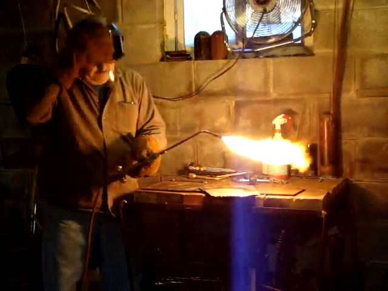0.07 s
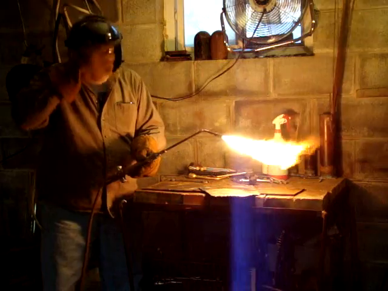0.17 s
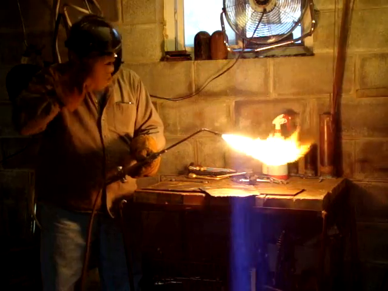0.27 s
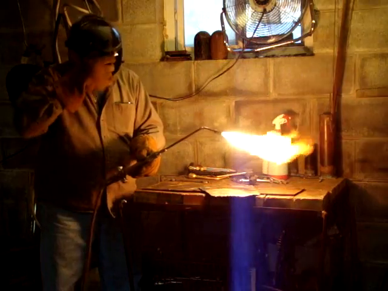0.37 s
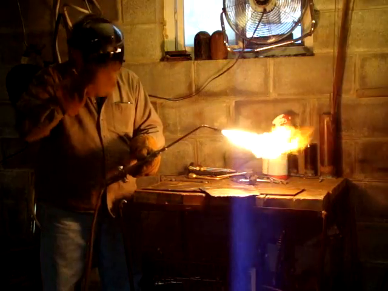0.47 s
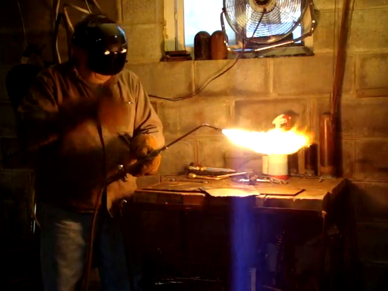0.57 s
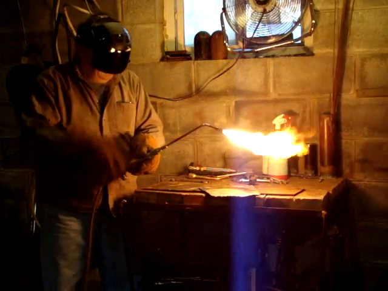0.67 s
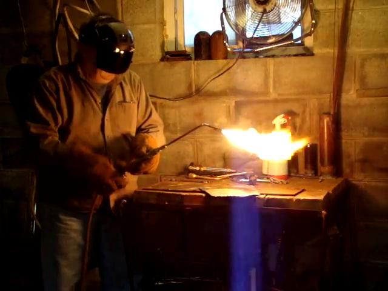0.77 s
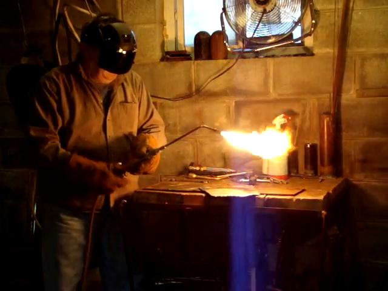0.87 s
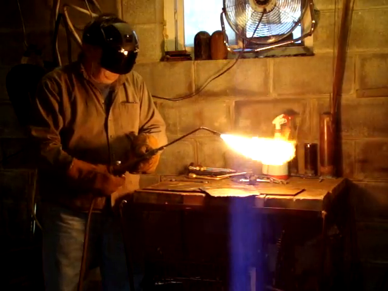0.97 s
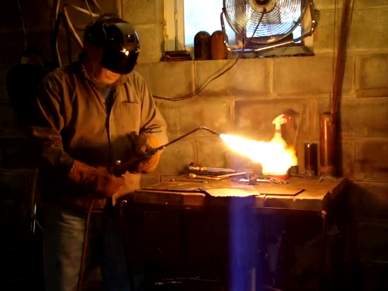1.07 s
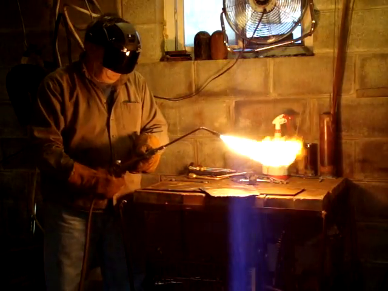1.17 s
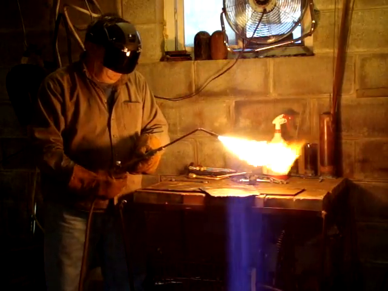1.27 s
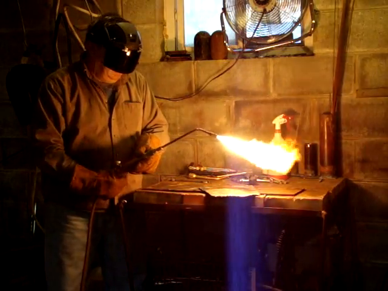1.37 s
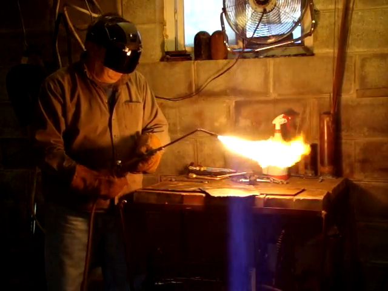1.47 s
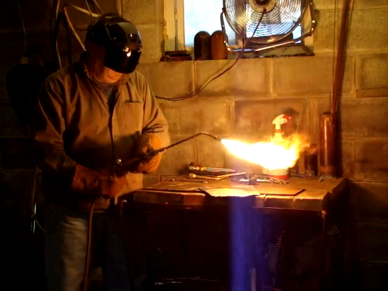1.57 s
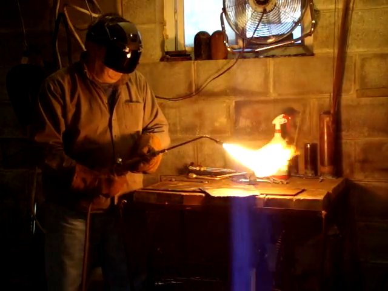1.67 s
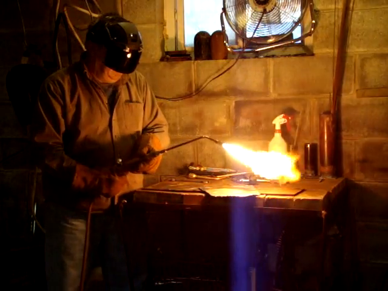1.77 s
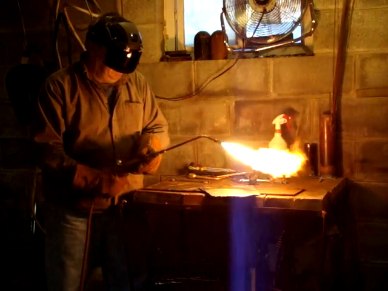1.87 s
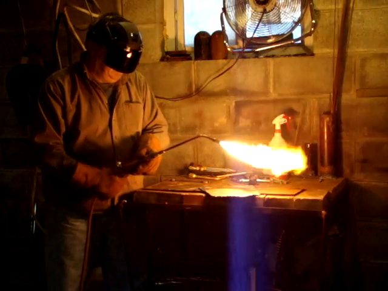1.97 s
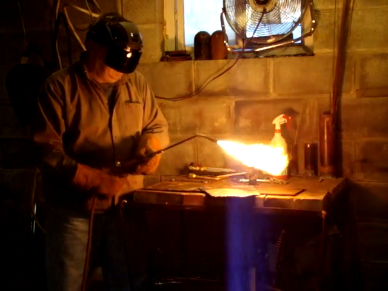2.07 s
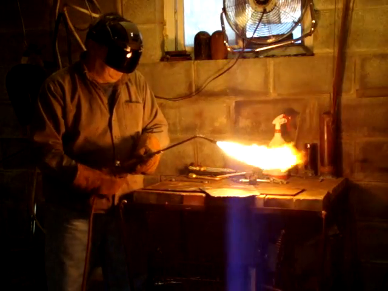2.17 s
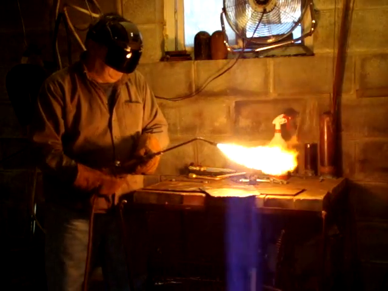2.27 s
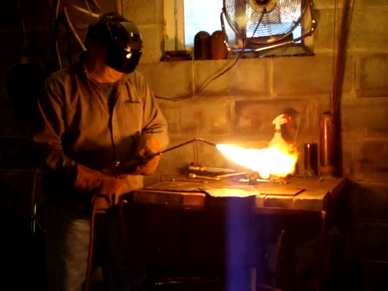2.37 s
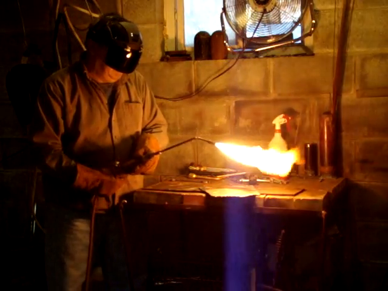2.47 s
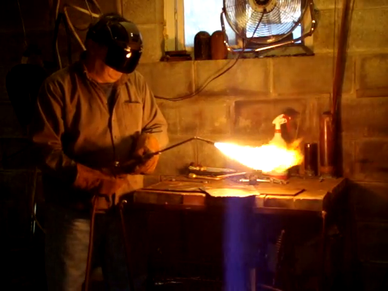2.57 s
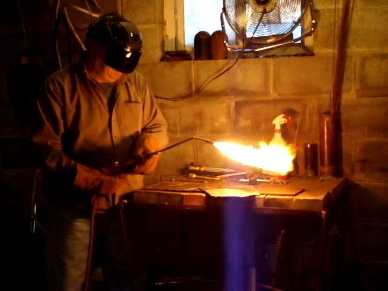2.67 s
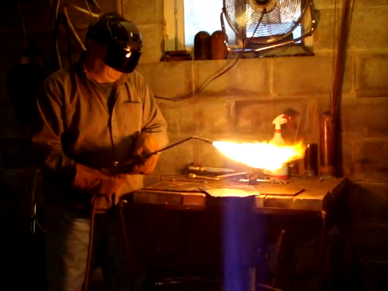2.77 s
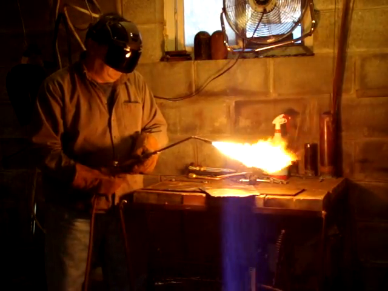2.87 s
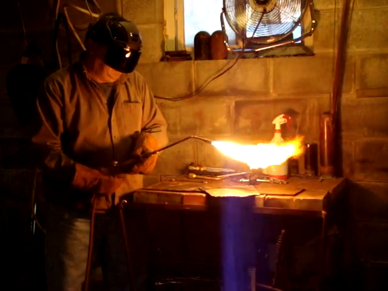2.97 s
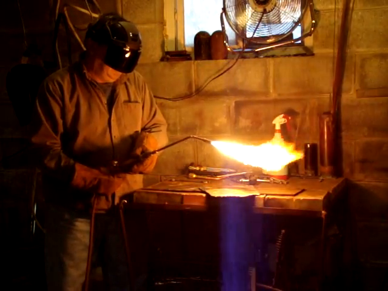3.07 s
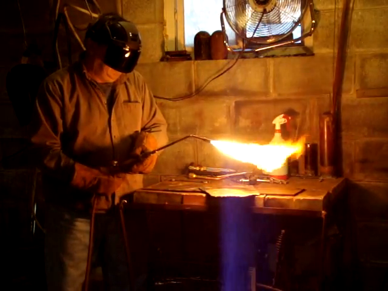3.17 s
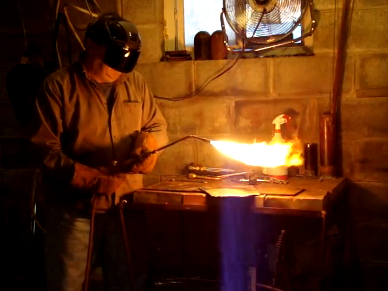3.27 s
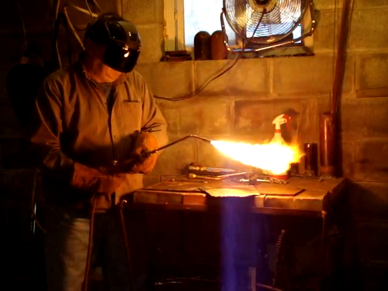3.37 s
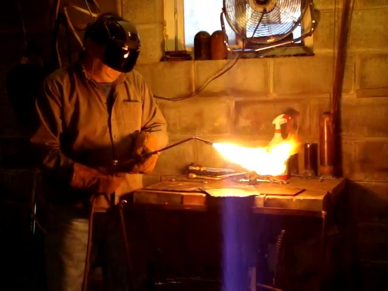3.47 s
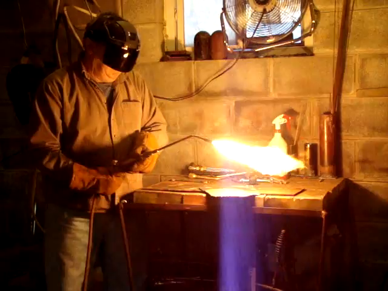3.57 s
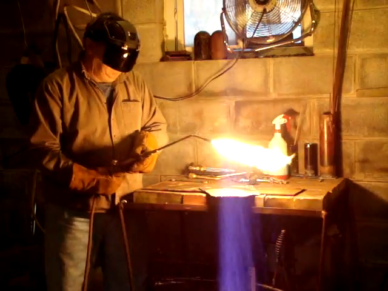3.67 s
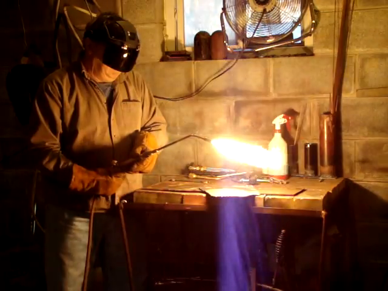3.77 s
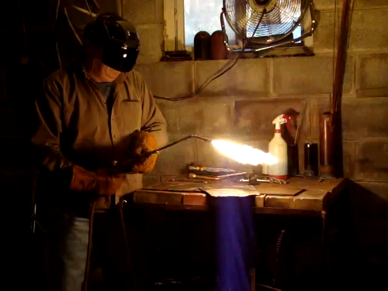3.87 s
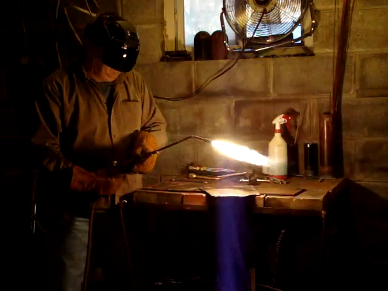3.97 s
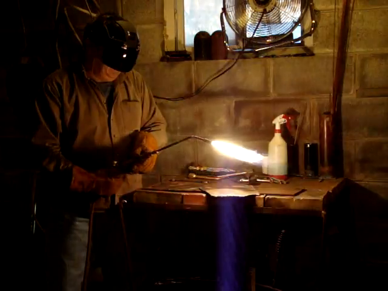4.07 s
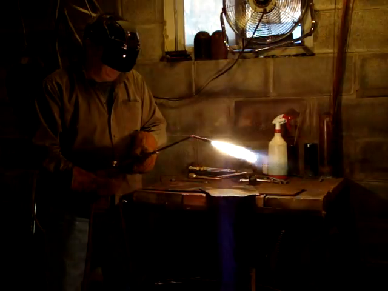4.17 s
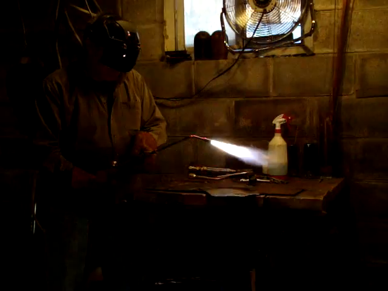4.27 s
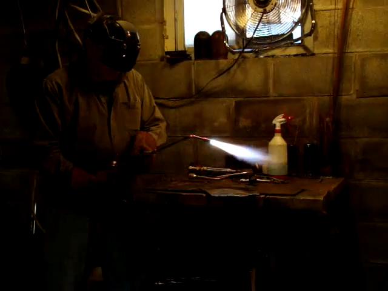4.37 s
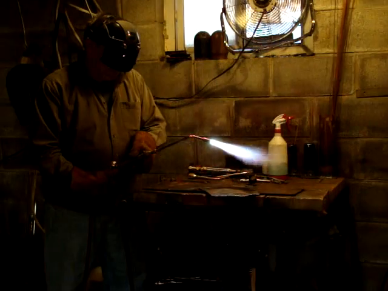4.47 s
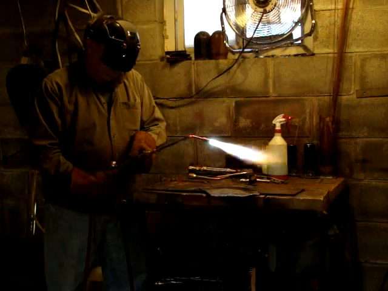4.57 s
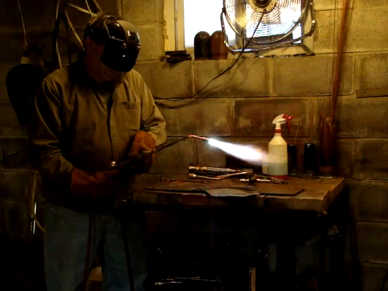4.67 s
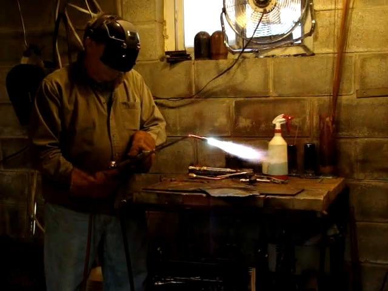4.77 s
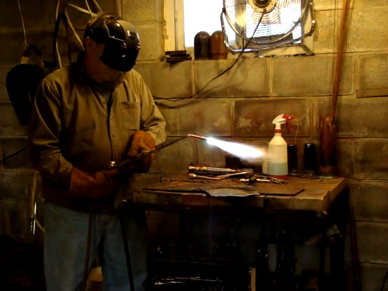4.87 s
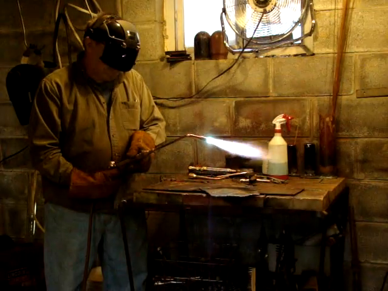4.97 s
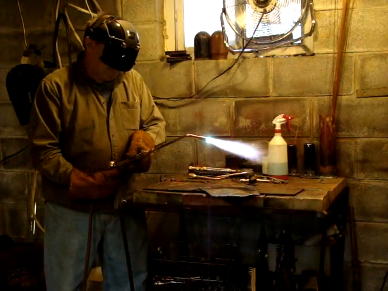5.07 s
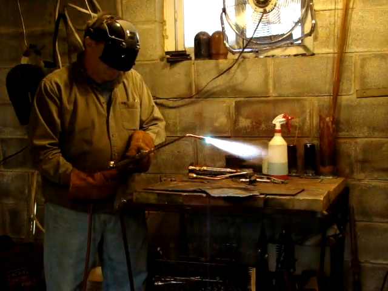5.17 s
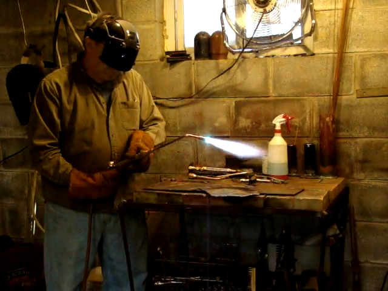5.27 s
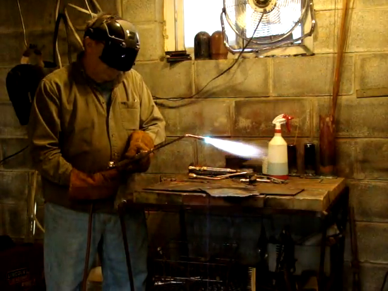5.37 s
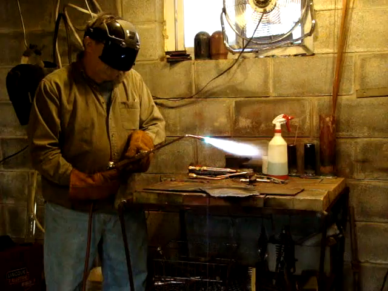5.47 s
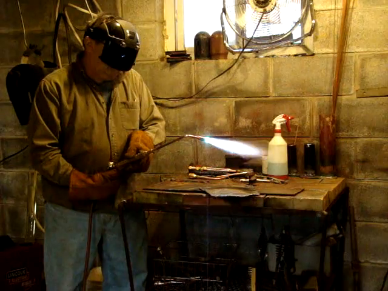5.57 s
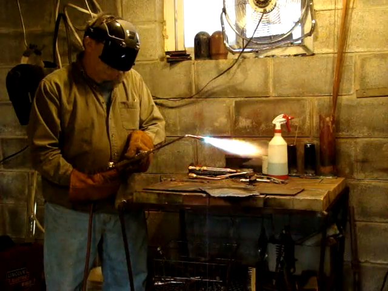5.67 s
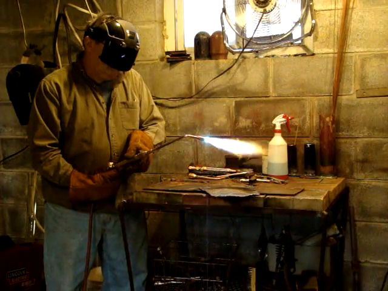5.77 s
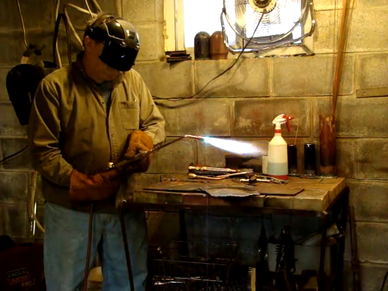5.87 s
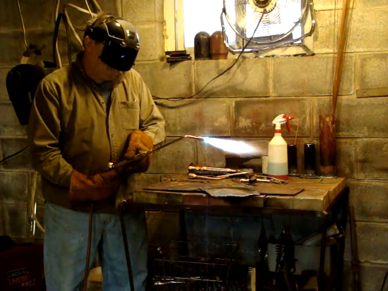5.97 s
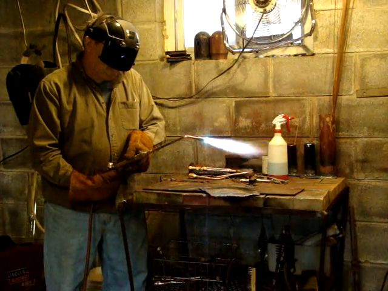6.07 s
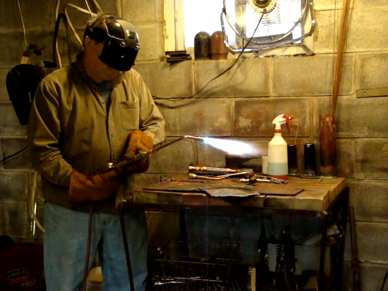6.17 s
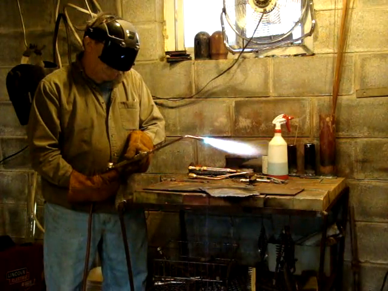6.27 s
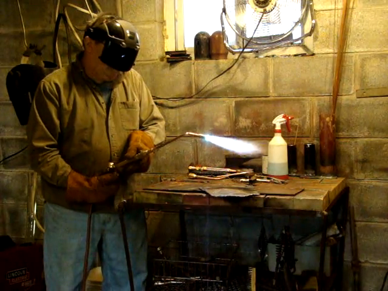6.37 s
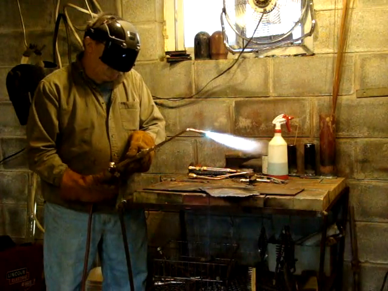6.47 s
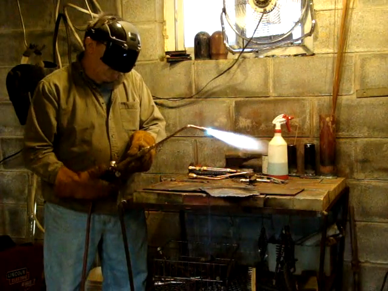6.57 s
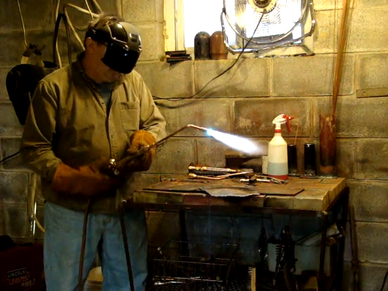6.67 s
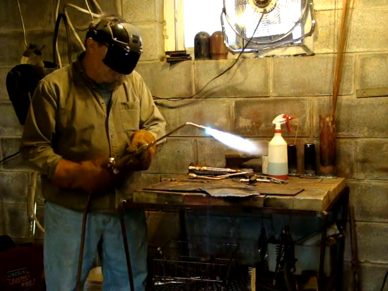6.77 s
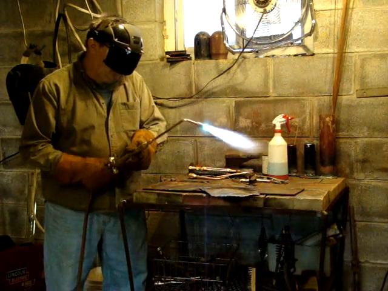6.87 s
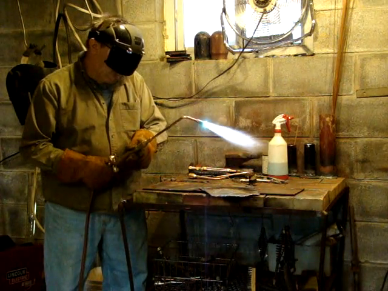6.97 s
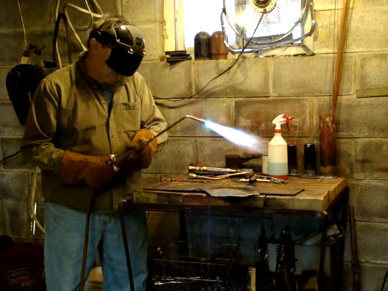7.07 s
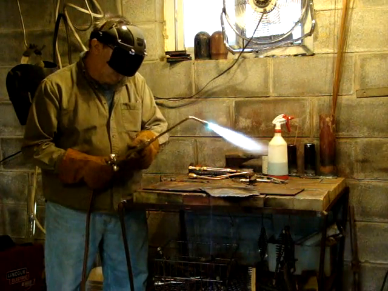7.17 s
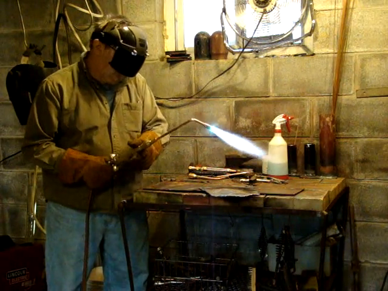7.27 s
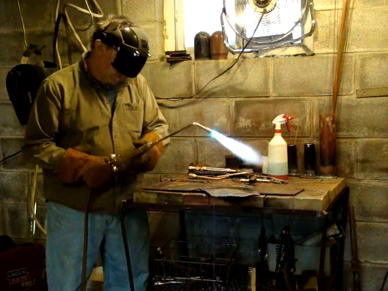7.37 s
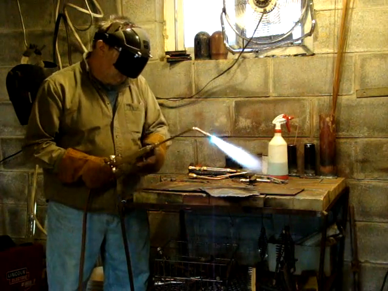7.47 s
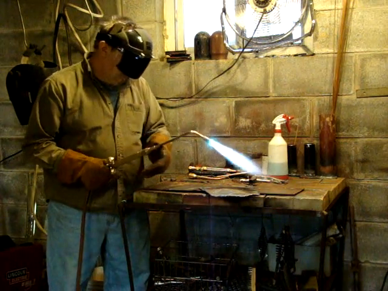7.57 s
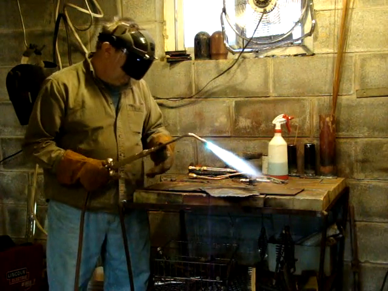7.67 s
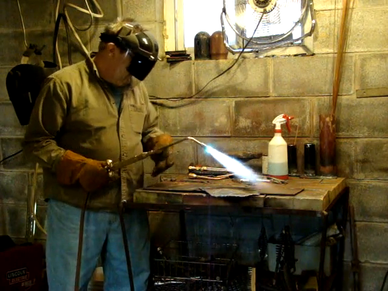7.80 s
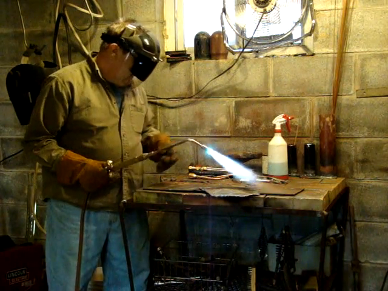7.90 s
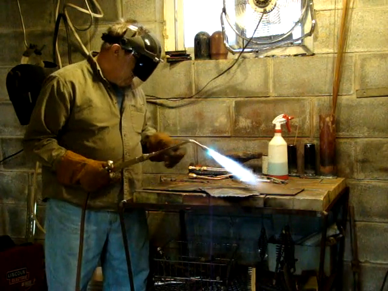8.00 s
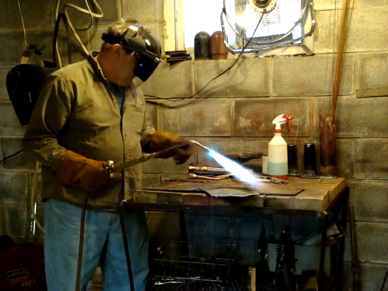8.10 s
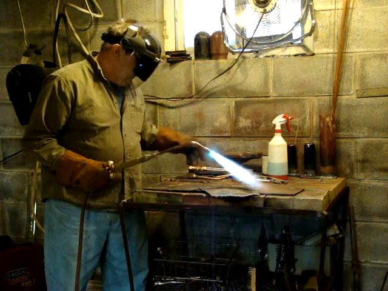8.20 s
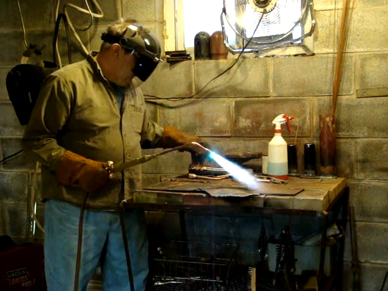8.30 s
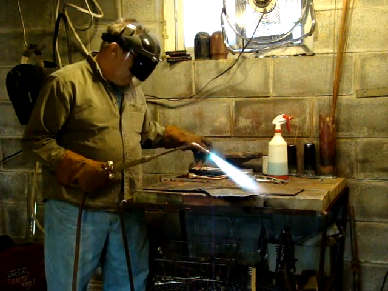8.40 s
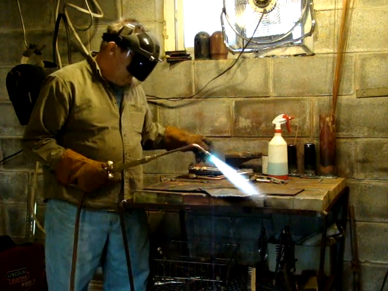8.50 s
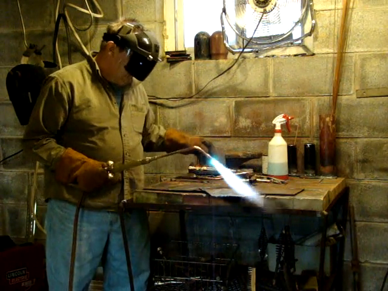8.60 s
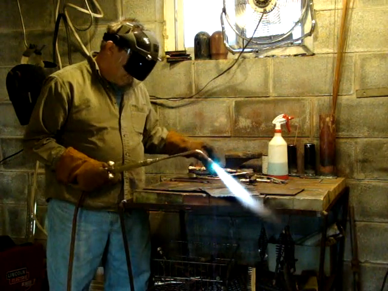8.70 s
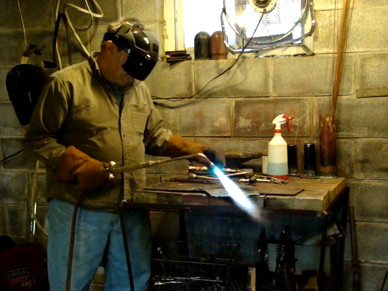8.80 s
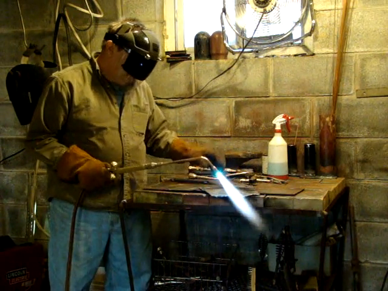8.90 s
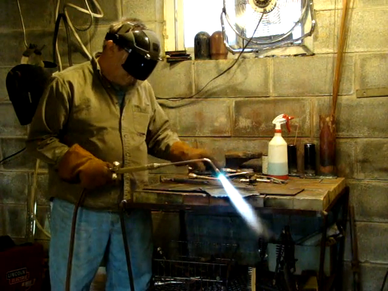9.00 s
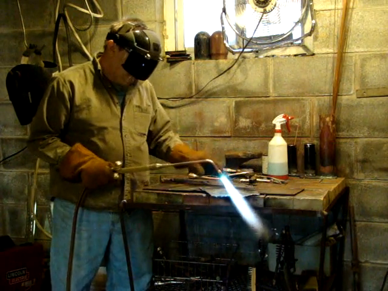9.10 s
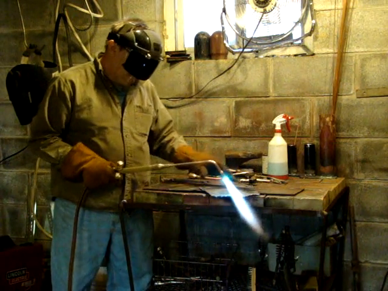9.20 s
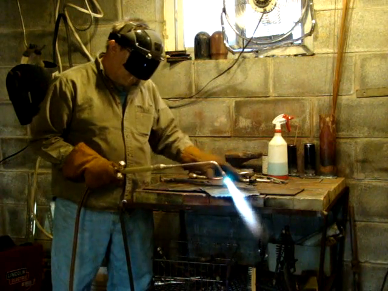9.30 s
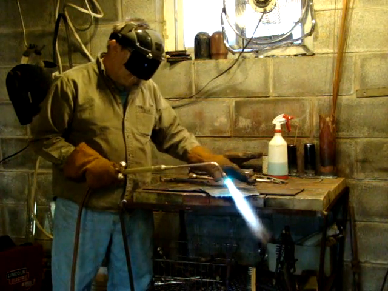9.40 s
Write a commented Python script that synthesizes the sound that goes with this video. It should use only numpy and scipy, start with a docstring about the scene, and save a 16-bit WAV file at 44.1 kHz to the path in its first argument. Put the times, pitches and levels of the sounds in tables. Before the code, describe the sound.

A torch flame roars steadily in a small workshop, flares into a loud gas rush that sweeps upward, then settles to a sharp hiss.

```python
"""An oxy-acetylene cutting torch burns over a steel bench in a small block-walled workshop.
First the long yellow acetylene flame roars. Oxygen is opened: the roar flares, and the rush of gas swells,
sinks in pitch, then sweeps upward as the flame shrinks. A short blue flame is left hissing, its cone rustling
lower down. The torch is then lowered toward the bench, and at last its tip turns away.
Each source is noise shaped by a spectrum that changes in time; the room adds peaks, nulls and echoes."""
import sys
import numpy as np
from scipy import signal
from scipy.io import wavfile
from scipy.ndimage import uniform_filter1d

SR = 44100
rng = np.random.default_rng(int(sys.argv[2]) if len(sys.argv) > 2 else 0)


def unload_audio(sound):
    """Save the sound as a 16-bit wav file, at the path given as the first command line argument."""
    columns = np.transpose(np.atleast_2d(sound))
    # keep every value between -1 and 1, then stretch to whole-number steps
    steps = np.round(np.clip(columns, -1, 1) * 32767)
    wavfile.write(sys.argv[1], SR, steps.astype(np.int16))


N = 416304  # length in samples

# the sound is shaped in short overlapping frames (samples); the microphone hears up to EDGE_HZ
FRAME, HOP = 4096, 512
EDGE_HZ = 10080
HZ = np.fft.rfftfreq(FRAME, 1 / SR)
TIMES = np.arange(N // HOP + 3) * HOP / SR  # start of each step in seconds

# shape of the big flame's noise, also used for the low part of the rush: pitch_hz [Hz],
# level_db [dB per Hz, only relative: each source sets its own loudness]
ROAR_SPECTRUM = [(20, -36), (70.0, -19.5), (125.0, -29), (165.0, -16), (210.0, -3), (270.0, -0.35),
                 (600.0, 0.5), (1100.0, -2), (2000.0, -3), (3500.0, -2), (5500.0, -6), (7500.0, -10),
                 (10000.0, -11)]

# the oxygen valve cracks open and the plume flares, then the yellow flame collapses
OPEN_S, COLLAPSE_S = 3.534, 3.995
FLARE_S = .28  # the flare and the first rustle of the cone both take this long to come in
# moves of the torch (start_s, length_s): the flame draws back from a spread plume to the tip,
# the torch is lowered toward the bench, and its tip turns away
SHORTENING = (2.67, 2.4)
LOWERING, TURNING = (6.1, 1.3), (8.95, .3)


def roar(flicker_db=.5):
    """Large eddies of the burning plume: a broad, flickering roar that flares and collapses."""
    steady_db, flare_db = -21.5, 4.5
    drop_db, drop_s, dying_db_per_s = 14.5, 0.12, 15.5  # a quick drop and a slow dying away
    flare = flare_db * ramp(OPEN_S, FLARE_S)
    quick_drop = drop_db * settle(COLLAPSE_S, drop_s)
    dying_away = dying_db_per_s * since(COLLAPSE_S)
    flicker = flicker_db * eddies(size=(4, 180))
    level_db = steady_db + flare - quick_drop - dying_away + flicker
    return unit_band(spectrum(ROAR_SPECTRUM)) * from_db(level_db)


def rush(rise=5.85, fall=2.4, skirt_db=-24):
    """A broad hump, steep on its low side, that climbs as the gas runs faster and its eddies shrink."""
    # loudness and centre with fuel alone, in the surge, and with the blue flame
    fuel_db, surge_db, blue_db = -35, -14, -28.5
    fuel_hz, surge_hz, blue_hz = 2600, 1450, 5640
    surge_s, attack_s, hold_s, release_s = 3.678, 0.29, 0.12, 0.52
    climb_s, climb_time_s = 3.92, 0.31

    attack = ramp(surge_s, attack_s)
    release = settle(surge_s + attack_s + hold_s, release_s)
    level_db = fuel_db + (surge_db - fuel_db) * attack + (blue_db - surge_db) * release

    # the centre sinks as the plume swells, then climbs as the flame shrinks
    sink_hz = (surge_hz - fuel_hz) * ramp(OPEN_S, climb_s - OPEN_S)
    climb_hz = (blue_hz - surge_hz) * settle(climb_s, climb_time_s)
    centre_hz = fuel_hz + sink_hz + climb_hz
    ratio = (HZ + 1) / centre_hz
    hump = 1 / np.sqrt(ratio ** -rise + ratio ** fall)
    skirt = from_db(skirt_db) * spectrum(ROAR_SPECTRUM)  # a few large eddies remain below the hump
    return unit_band(np.hypot(hump, skirt)) * from_db(level_db)


def jet(flicker_db=1.0):
    """Gas leaving the fine holes of the tip: a hiss that is strongest toward the top."""
    # shape of the hiss: pitch_hz [Hz], level_db [dB per Hz, only relative]
    jet_points = [(100, -68), (1500.0, -43), (3000.0, -25), (4500.0, -14.5), (6000.0, -11.5), (7500.0, 1.4),
                  (8800.0, 7.5), (10000.0, 6.5)]
    full_db, valve_turn_s = -24, 0.91
    sag_db, sag_time_s, turned_db = 3, 0.99, -1.1
    growth = ramp(OPEN_S, valve_turn_s)  # it grows while the valve turns
    sag = sag_db * settle(OPEN_S + valve_turn_s, sag_time_s)  # then the pressure sags a little
    turned = turned_db * ramp(*TURNING)
    level_db = full_db - sag + turned + flicker_db * eddies(size=(4, 140))
    return unit_band(spectrum(jet_points)) * growth * from_db(level_db)


def cone(flicker_db=0.8):
    """The blue inner cone rustles once the oxygen flows: faint at first, it builds after the collapse."""
    # shape of the rustle: pitch_hz [Hz], level_db [dB per Hz, only relative]
    cone_points = [(20, -34), (70.0, -27.5), (125.0, -35.5), (165.0, -17.5), (210.0, -15), (270.0, -3.5),
                   (700.0, 2.3), (1200.0, -1), (2000.0, -1), (3000.0, -3), (5000.0, -3.5), (10000.0, -19.5)]
    steady_db, growth_db, growth_time_s, turned_db = -30, 15, 1.24, -1.1
    still_missing = growth_db * (1 - settle(COLLAPSE_S, growth_time_s))
    turned = turned_db * ramp(*TURNING)
    level_db = steady_db - still_missing + turned + flicker_db * eddies(size=(6, 60))
    return unit_band(spectrum(cone_points)) * ramp(OPEN_S, FLARE_S) * from_db(level_db)


def flickering(x, above_hz=7000, depth_db=1.0):
    """The treble flickers quickly: a smoothed random gain is laid on it alone."""
    high_pass = signal.butter(6, above_hz, "high", fs=SR, output="sos")
    treble = signal.sosfiltfilt(high_pass, x)
    wobble = evened(uniform_filter1d(rng.standard_normal(N), size=280))
    return x + treble * (from_db(depth_db * wobble) - 1)


def workshop(ripple_db=3.0, first_s=.002, spread_s=.018, count=90):
    """Standing waves, plus a fine comb of echoes whose paths change as the flame moves."""
    sound_speed = 343  # m/s
    step = 8  # echoes are worked out at every eighth frame, then smoothed
    # how fast the flame wanders in a steady hand, and the speed added once lowering starts
    held_m_per_s, added_m_per_s = 0.02794, 0.0705
    moved_m = held_m_per_s * since(0) + added_m_per_s * since(LOWERING[0])
    moved_s = moved_m[::step] / sound_speed
    comb = 0
    for lateness, direction, turn in rng.random((count, 3)):
        delay_s = first_s + spread_s * lateness + np.cos(np.pi * direction) * moved_s
        comb = comb + np.cos(2 * np.pi * (HZ * delay_s + turn))
    comb = np.repeat(comb, step, axis=0)
    comb = uniform_filter1d(comb, step, axis=0)[:len(TIMES)]
    treble_share = HZ / np.hypot(HZ, 1800)  # in the bass the standing waves rule alone
    ripple = ripple_db * evened(comb) * treble_share
    return from_db(standing_waves() + ripple)


def standing_waves(walls=1.1, walls_lowered=0.6, plume=0.98, tip=0.89, bench=1.03):
    """The room's colour in dB: from plume to tip as the flame shortens, then to the bench as it is lowered."""
    # peaks and nulls between the walls, with the flame spread out, with the short flame held level,
    # and close over the bench: pitch_hz [Hz], width_hz [Hz],
    # level_db [dB, before the strengths given as arguments; negative for a null]
    wall_waves = [(214, 34, -8.4), (319, 79, 5.6), (346, 108, -3.1), (403, 75, -1.5), (488, 92, -4.4),
                  (565, 49, 1.7), (731, 22, -4.0), (797, 35, -3.6), (909, 38, 4.6), (936, 27, -6.3),
                  (986, 28, 4.6), (1023, 48, -4.3), (1187, 30, 3.3), (1252, 64, -3.7), (1383, 36, -5.4),
                  (1417, 36, 1.8), (1459, 173, 5.4), (1595, 106, -4.4), (1699, 43, 5.9), (1791, 58, 5.8),
                  (1980, 64, 6.3), (2164, 150, -2.5), (2422, 65, -4.3), (2447, 66, 5.6), (2604, 44, 3.7),
                  (2656, 35, -4.4), (2772, 91, 3.2), (3021, 122, -3.1), (3501, 30, 4.0), (4590, 115, -2.5)]
    plume_waves = [(257, 22, -2.6), (382, 56, 2.2), (602, 49, 4.3), (1137, 42, -1.9), (1309, 23, 2.1),
                   (1659, 22, -2.5), (1892, 22, -2.6), (2248, 22, -3.7), (2327, 51, 2.7), (2944, 29, 3.2),
                   (3116, 35, 3.5), (3163, 139, -2.2), (3582, 53, -3.3), (3735, 68, 3.5), (3820, 394, -1.2),
                   (4470, 90, 1.9), (4888, 31, -3.5), (5010, 244, 1.8), (5600, 51, 2.6), (6461, 188, 1.8)]
    tip_waves = [(377, 48, -2.5), (494, 22, 3.2), (616, 66, -3.6), (761, 31, 3.2), (848, 24, 3.6),
                 (1138, 35, -2.8), (1541, 34, 3.7), (1580, 43, -2.9), (2448, 70, 3.2), (2897, 47, -3.0),
                 (3128, 40, 5.3), (3206, 64, -3.2), (3241, 26, 5.8), (3453, 161, 1.9), (3797, 37, -5.7),
                 (3843, 54, 3.6), (3894, 42, -3.6), (4330, 123, -4.7), (5322, 53, -4.0), (5429, 105, -3.8),
                 (5547, 37, 4.6), (5747, 141, -2.4), (6069, 210, 3.0), (6359, 90, 4.0), (7227, 104, -4.0),
                 (7354, 77, 3.9), (8200, 241, -3.2), (9508, 88, -3.4)]
    bench_waves = [(243, 22, 3.0), (363, 65, -4.3), (402, 40, -4.3), (452, 22, 3.6), (552, 36, 3.3),
                   (595, 61, -5.6), (812, 22, 4.2), (844, 43, 5.6), (903, 30, -2.0), (1048, 42, 4.1),
                   (1146, 35, 3.6), (1685, 31, -3.6), (1814, 87, -3.8), (1978, 34, -3.2), (2461, 35, -3.3),
                   (2532, 52, 2.4), (2733, 38, -3.6), (2920, 57, -4.2), (3072, 131, 1.9), (3243, 49, -4.0),
                   (3470, 123, -2.4), (4256, 395, -1.7)]
    short, low = ramp(*SHORTENING), ramp(*LOWERING)
    spread_out = plume * (1 - short) * bumps(plume_waves)
    drawn_back = tip * short * bumps(tip_waves)
    held = walls * bumps(wall_waves) + spread_out + drawn_back
    lowered = walls_lowered * bumps(wall_waves) + bench * bumps(bench_waves)
    return (1 - low) * held + low * lowered


def eddies(size):
    """Smooth random patches of unit rms, size = (frames, bins)."""
    field = rng.standard_normal((len(TIMES), len(HZ)))
    smooth_in_time = uniform_filter1d(field, size[0], axis=0)
    return evened(uniform_filter1d(smooth_in_time, size[1], axis=1))


def spectrum(points):
    """Gain of every bin, from points joined on a log-frequency axis."""
    hz, db = np.transpose(points)
    return from_db(np.interp(np.log(HZ + 1), np.log(hz), db))


def unit_band(gain):
    """Scales a spectrum so that noise shaped by it has unit rms in the microphone's band."""
    heard_power = gain ** 2 * (HZ < EDGE_HZ)
    return gain / np.sqrt(np.mean(heard_power, axis=-1, keepdims=True))


def bumps(rows):
    """Peaks and nulls as one dB curve over frequency."""
    return sum(db * np.exp(-(2 * (HZ - hz) / width) ** 2) for hz, width, db in rows)


def since(start_s):
    """Seconds gone by since a moment, at every frame; zero before it."""
    return np.maximum(TIMES - start_s, 0)[:, None]


def ramp(start_s, length_s):
    """A steady move from 0 to 1."""
    return np.minimum(since(start_s) / length_s, 1)


def settle(start_s, time_s):
    """A move from 0 toward 1 that starts fast and eases off."""
    return 1 - np.exp(-since(start_s) / time_s)


def from_db(db):
    """Decibels to gain."""
    return 10 ** (np.asarray(db) / 20)


def evened(x):
    """Scales to an rms of one."""
    return x / np.sqrt(np.mean(x ** 2) + 1e-20)


def scene():
    """Roar, rush, jet and cone add in power and reach the microphone through the room."""
    sources = np.sqrt(roar() ** 2 + rush() ** 2 + jet() ** 2 + cone() ** 2)
    gain = sources * workshop()
    noise = rng.standard_normal((len(TIMES) - 1) * HOP)
    turbulence = signal.stft(noise, nperseg=FRAME, noverlap=FRAME - HOP)[2]
    flame = signal.istft(turbulence * gain.T, nperseg=FRAME, noverlap=FRAME - HOP)[1][:N]
    torch = flickering(flame)
    return np.array([torch, torch])  # the same sound on both sides


def record(dry):
    """A mono microphone that rounds off the highest peaks, then a steep band limit."""
    rounded = dry / (1 + (dry / .85) ** 8) ** (1 / 8)
    low_pass = signal.firwin(1023, EDGE_HZ, window=("kaiser", 9), fs=SR)
    return signal.oaconvolve(rounded, low_pass[None], "same")


dry = scene()
out = record(dry)
unload_audio(out)
```